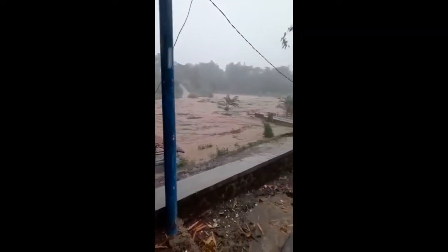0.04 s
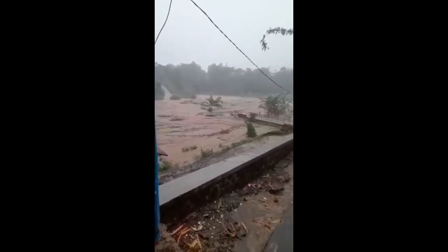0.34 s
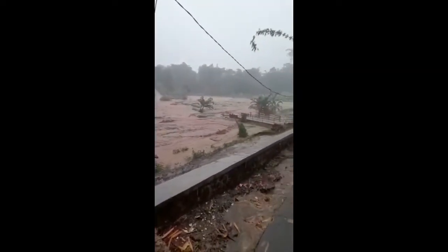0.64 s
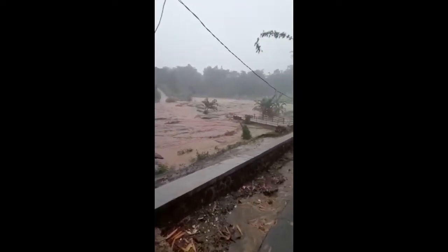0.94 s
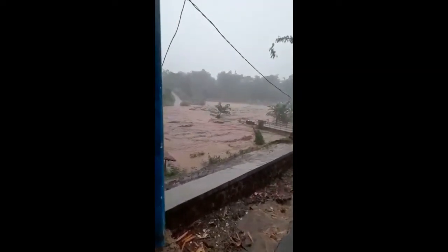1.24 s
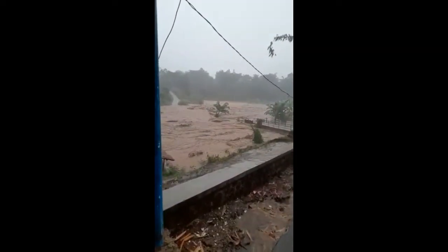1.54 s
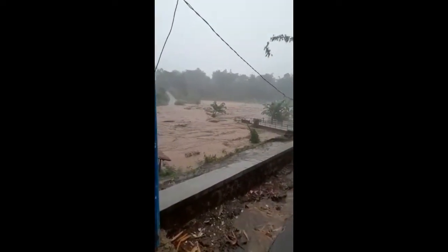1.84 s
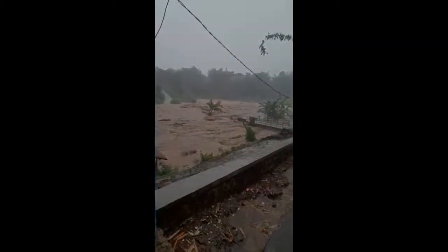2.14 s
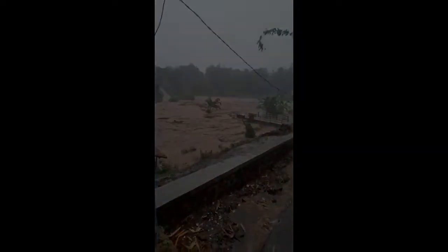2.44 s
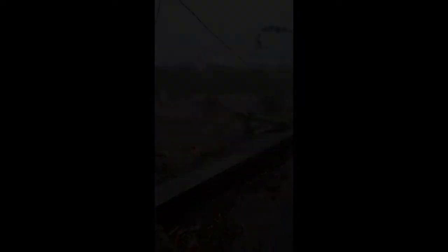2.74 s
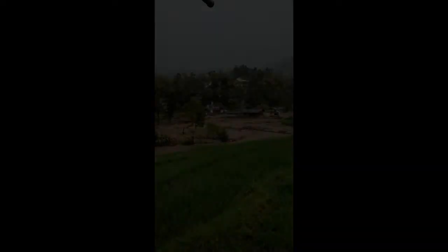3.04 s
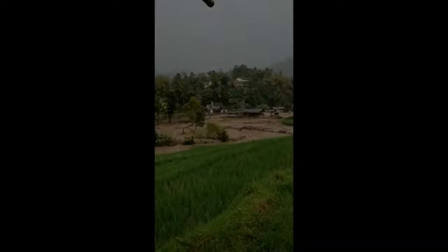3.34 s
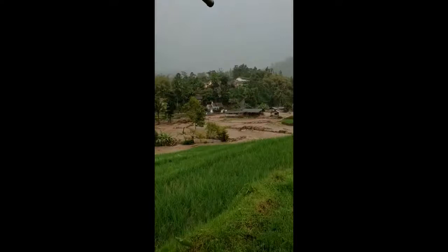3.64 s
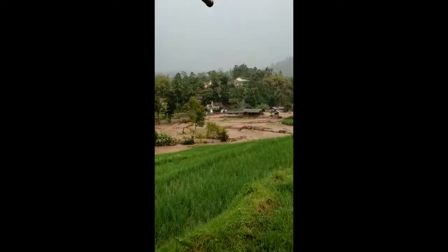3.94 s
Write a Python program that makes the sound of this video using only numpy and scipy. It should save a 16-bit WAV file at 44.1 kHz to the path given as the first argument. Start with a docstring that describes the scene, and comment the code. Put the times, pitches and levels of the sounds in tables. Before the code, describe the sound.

Rushing floodwater is heard from the bank, with raindrops tapping an umbrella just above the microphone and spattering the ground. After a brief silence, the flood returns farther off and fades, before loud rushing water ends it.

```python
"""A muddy river in flood, heard from three places in turn. First, on the bank, heavy rain drums on the
taut cloth of an umbrella just overhead and splashes on the ground, over the roar of countless bubbles.
This view fades and cuts to silence at 2.9 s. At 3.2 s the flood returns, duller from across a field,
and fades right out. At 3.9 s a loud stretch of torrent cuts in for the last moment."""
import sys
import numpy as np
from scipy import signal
from scipy.fft import rfft, irfft
from scipy.io import wavfile

SR = 44100
rng = np.random.default_rng(int(sys.argv[2]) if len(sys.argv) > 2 else 0)


def waveform_to_disk(signal):
    """Save audio, clipped to [-1, 1], as 16-bit WAV at the path in sys.argv[1]."""
    frames = np.transpose(np.atleast_2d(signal))
    scaled = np.clip(frames, -1, 1) * 32767
    samples = np.round(scaled).astype(np.int16)
    wavfile.write(sys.argv[1], SR, samples)


N = 176400
GRAIN = 4096  # samples in one drop's sound
BANK_END_S, FIELD_START_S, TORRENT_START_S = 2.899, 3.194, 3.904


def water(spectrum, alike_hz):
    """Countless bubbles merge to a roar that churns octave by octave and surges slightly as a whole."""
    hz = np.fft.rfftfreq(N, 1 / SR)
    roar = stereo_noise(alike_hz, size=N) * gains(spectrum, hz) * np.sqrt(SR / 2)
    octave = np.log2(np.clip(hz, 60, 15360) / 60)
    churn_db, surge_db = .6, .25
    bands = (irfft(roar * np.maximum(1 - abs(octave - k), 0), N) for k in range(9))
    churning = sum(band * undb(churn_db * wander(rate_hz=14)) for band in bands)
    return churning * undb(surge_db * wander(rate_hz=3))


def river_from_bank():
    """The flood close by, with the hiss of rain on top."""
    # The roar's colour. Each row: frequency in Hz, left and right relative level in dB.
    spectrum = [(20, -78.5, -82), (40, -80.5, -71.5), (62, -60.5, -56), (111, -53.0, -50), (204, -58, -58),
                (456, -54, -54.5), (730, -55, -56.5), (1190, -59.5, -56), (2000, -61, -57.5),
                (2910, -63.5, -60), (3200, -66, -63.5), (6550, -68.5, -65.5), (8530, -74.0, -74.5),
                (12000, -71, -67.5), (15500, -74, -76)]
    return undb(-2) * water(spectrum, alike_hz=700)


def river_across_field():
    """The flood from farther off, softer and duller."""
    # The distant roar's colour. Each row: frequency in Hz, left and right relative level in dB.
    spectrum = [(29.9, -93, -91), (80, -62, -63.5), (130, -61.5, -61.5), (220, -61.5, -60.5),
                (340, -64.3, -63), (480, -66.5, -69), (630, -61, -62.5), (950, -66.5, -64),
                (1260, -69.5, -68.5), (1700, -69.5, -65), (2400, -72.5, -68.5), (2800, -76.5, -74),
                (4330, -77, -73), (5300, -83, -83), (6800, -86, -82), (9300, -94.5, -94), (12100, -82, -96),
                (14700, -96, -105), (15700, -115, -125)]
    return undb(3) * water(spectrum, alike_hz=1490)


def torrent():
    """A loud stretch of rushing water, heavy in the low mids."""
    # The torrent's colour. Each row: frequency in Hz, left and right relative level in dB.
    spectrum = [(30, -81.9, -80.8), (60, -64, -64), (100, -49.5, -49.5), (230, -47, -46), (493, -53, -54.5),
                (720, -50.5, -50), (1210, -57.5, -55), (2300, -59, -55), (2980, -64, -61.5),
                (4430, -63.5, -61.5), (5950, -72.5, -70.5), (10300, -80.5, -81.4), (12000, -69.5, -82.9),
                (14800, -83, -92.4), (15800, -105, -105)]
    return water(spectrum, alike_hz=1300)


def umbrella():
    """Drips and rain dent the cloth and spray off it; each spot they hit rings a little differently."""
    # Heavy drips. Each row: start in seconds, relative level in dB.
    drips = [(0.0303, -21), (0.129, -19), (0.168, -14.5), (0.209, -13.5), (0.24, -15), (0.318, -19.5),
             (0.509, -16), (0.604, -17), (0.683, -19), (0.751, -16.5), (0.827, -15), (1.051, -16.5),
             (1.077, -17), (1.129, -19), (1.147, -20.5), (1.186, -19), (1.219, -18.5), (1.286, -13.5),
             (1.314, -18), (1.501, -19.5), (1.653, -17.5), (1.813, -15), (1.9446, -21.5), (1.994, -15.5),
             (2.069, -14), (2.1643, -20.5), (2.186, -17), (2.312, -19), (2.429, -17.5), (2.465, -16.5),
             (2.602, -17), (2.661, -20.5), (2.726, -17.5)]
    # The taut cloth's modes. Each row: pitch in Hz, seconds to fall 60 dB, left and right level in dB.
    cloth = [(270, 0.064, -17.5, -23.5), (304.3, 0.087, -21.5, -11.5), (368.5, .05, -17, -11),
             (567, 0.031, -10.5, -13), (710, 0.027, -10.5, -9.5)]
    # A drop's slap on the cloth. Each row: frequency in Hz, left and right relative level in dB.
    slap_colour = [(50, -24.5, -13), (128.8, 0.5, -4), (404, 1, -3), (800, -1.5, -4.5), (1290, -2.5, -1.5),
                   (2700, -12.5, -4), (3400, -20.5, -19), (7000, -26, -23), (15000, -39, -38)]
    drip_db, rain_db, slap_db = 6, -23.5, 11.5
    lag_s, lag_spread_s = .00037, .00012  # the right side hears the cloth later
    out, t = np.zeros((2, N)), np.arange(GRAIN) / SR
    modes, slap = np.array(cloth), response(slap_colour)
    decays = np.exp(-np.log(1000) * t / modes[:, 1:2])
    dent = -2.4 * irfft(slap)  # the cloth is pushed in, then springs back and rings

    def drop():
        hz = modes[:, :1] * (1 + 0.059 * rng.standard_normal((len(modes), 1)))
        strength = undb(2.55 * rng.standard_normal((len(modes), 1)))
        ring = undb(modes[:, 2:].T) @ (strength * decays * np.sin(2 * np.pi * hz * t))
        return ring + undb(slap_db) * (dent + spray(slap, decay_s=.0012))

    for s, db in drips:
        add(out, s, undb(db + drip_db) * drop(), lag_s)
    spots = [drop() for _ in range(96)]
    count = 1600
    landings, lags = rng.integers(len(spots), size=count), rng.standard_normal(count)
    rain = shower(per_s=260, spread_db=3.5, count=count)
    for (s, db), spot, lag in zip(rain, landings, lags):
        add(out, s, undb(db + rain_db) * spots[spot], lag_s + lag_spread_s * lag)
    return out


def ground():
    """Drops burst on wet concrete: a few sharp, faintly pitched splashes over a fine spatter."""
    # Close splashes. Each row: start in seconds, relative level in dB, pitch in Hz, left minus right in dB.
    splashes = [(0.0328, -26.5, 11200, 0), (0.2502, -30, 11900, -4), (0.5492, -20, 9900, 1),
                (0.598, -25, 11100, -1), (0.6286, -27, 11700, -2), (1.1047, -28, 10800, 0),
                (1.1938, -25.5, 10500, -3), (1.3225, -22, 11800, 2), (1.3889, -27, 11900, 0),
                (1.5803, -27, 12000, 2), (1.6647, -28, 11500, -2), (1.8886, -26, 13700, 1.5),
                (1.9395, -28, 9900, 5.5), (2.0205, -26, 12300, -3), (2.1866, -23, 12100, -2.5),
                (2.4053, -25, 13400, -3), (2.4728, -28, 12600, -7)]
    # A splash's bright colour. Each row: frequency in Hz, relative level in dB.
    splash_colour = [(1500, -27), (5000, -11), (8000, -3), (10000, 3), (12500, 1.5), (15500, -5)]
    splash_db, spatter_db, decay_s = 11, -31, .0009
    ring_db, ring_width_hz = 8, 900
    out, colour = np.zeros((2, N)), response(splash_colour)
    hz, sides = np.fft.rfftfreq(GRAIN, 1 / SR), np.array([[1], [-1]])
    for s, db, pitch_hz, pan_db in splashes:
        ring = 1 + (undb(ring_db) - 1) / (1 + 2j * (hz - pitch_hz) / ring_width_hz)
        add(out, s, undb(db + splash_db + sides * pan_db / 2) * spray(colour * ring, decay_s))
    ticks = [spray(colour, decay_s) * undb(sides * 2.8 * rng.standard_normal()) for _ in range(64)]
    for k, (s, db) in enumerate(shower(per_s=130, spread_db=5.5, count=900)):
        add(out, s, undb(db + spatter_db) * ticks[k % len(ticks)])
    return out


def spray(colour, decay_s):
    """A drop's spray: a quickly dying puff of coloured noise."""
    t = np.arange(GRAIN) / SR
    puff = irfft(stereo_noise(alike_hz=704, size=GRAIN)) * np.exp(-t / decay_s)
    return irfft(rfft(puff) * colour) / 2


def shower(per_s, spread_db, count):
    """Random drops until the bank view ends. Each row: start in seconds, relative level in dB."""
    chance = rng.random((count, 2))
    times = np.cumsum(-np.log(1 - chance[:, 0])) / per_s
    levels = spread_db * np.minimum(-np.log(1 - chance[:, 1]), 2.0)  # mostly small, capped at two spreads
    return np.column_stack([times, levels])[times < BANK_END_S]


def stereo_noise(alike_hz, size):
    """Spectra of a left and a right noise, alike below alike_hz and wide above it."""
    alike = .99 / (1 + (np.fft.rfftfreq(size, 1 / SR) / alike_hz) ** 2)
    centre = np.sqrt(alike) * rfft(rng.standard_normal(size))
    return centre + np.sqrt(1 - alike) * rfft(rng.standard_normal((2, size)))


def wander(rate_hz):
    """Smooth random drift with a spread of 1."""
    hz = np.fft.rfftfreq(N, 1 / SR)
    drift = irfft(rfft(rng.standard_normal(N)) * (hz > 0) / (1 + (hz / rate_hz) ** 2), N)
    return drift / drift.std()


def response(table):
    """Causal frequency response with the given colour, so that attacks stay sharp."""
    cepstrum = irfft(np.log(gains(table, np.fft.rfftfreq(GRAIN, 1 / SR))))
    cepstrum[:, 1:GRAIN // 2] *= 2
    cepstrum[:, GRAIN // 2 + 1:] = 0
    return np.exp(rfft(cepstrum))


def gains(table, hz):
    """Each dB column of a spectrum as gains at the given frequencies."""
    rows = np.array(table, float)
    return undb([np.interp(np.log(hz + 1), np.log(rows[:, 0]), col) for col in rows.T[1:]])


def undb(db):
    """Decibels to gain."""
    return 10 ** (np.asarray(db) / 20)


def add(out, s, pair, lag_s=0):
    """Mix a short stereo sound in at time s, its right side late by lag_s."""
    for side, wave, at in zip(out, pair, (s, s + lag_s)):
        i = int(np.clip(at * SR, 0, N))
        side[i:i + len(wave)] += wave[:N - i]


def microphone(sound, low_cut_hz=52):
    """The phone's microphone loses the deep bass."""
    return signal.sosfilt(signal.butter(4, low_cut_hz, "high", fs=SR, output="sos"), sound)


def scene():
    """Bank, field and torrent one after another, with plain fades and hard cuts."""
    t = np.arange(N) / SR
    bank = microphone(river_from_bank() + umbrella() + ground())
    field = microphone(river_across_field())
    rush = microphone(torrent())
    bank_fade_s, cut_decay_s, field_fade_s = 0.97, 0.0038, 0.67
    bank_fade = np.interp(t, [BANK_END_S - bank_fade_s, BANK_END_S], [1, 0.46])
    bank_cut = np.exp(-np.maximum(t - BANK_END_S, 0) / cut_decay_s)
    field_fade = (t >= FIELD_START_S) * np.clip((TORRENT_START_S - t) / field_fade_s, 0, 1) ** 1.045
    return bank * bank_fade * bank_cut + field * field_fade + rush * (t >= TORRENT_START_S)


def record(dry, top_hz=15750):
    """The phone cuts off the top of the treble."""
    return signal.sosfilt(signal.ellip(12, .1, 90, top_hz, fs=SR, output="sos"), dry)


dry = scene()
out = record(dry)
waveform_to_disk(out)
```